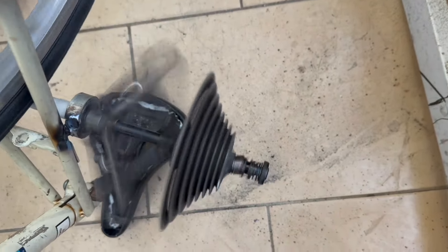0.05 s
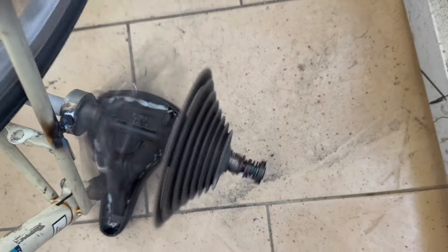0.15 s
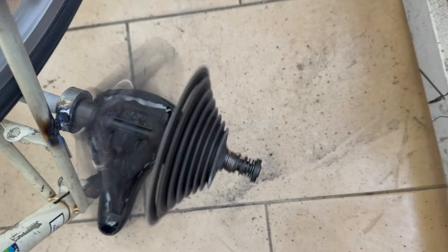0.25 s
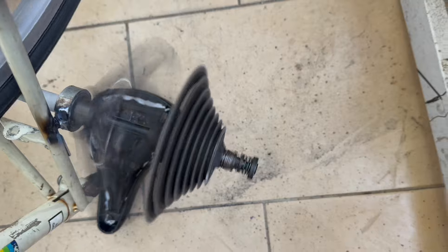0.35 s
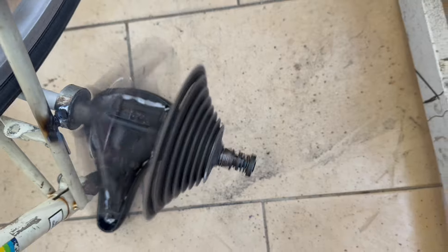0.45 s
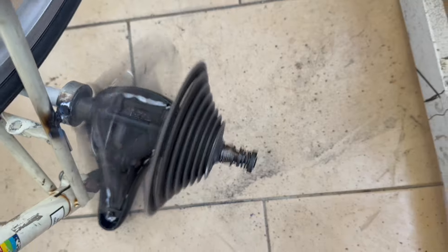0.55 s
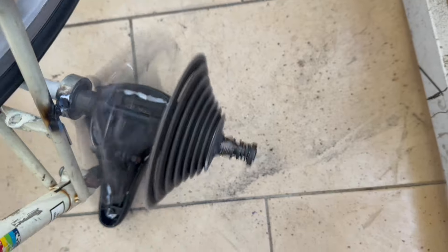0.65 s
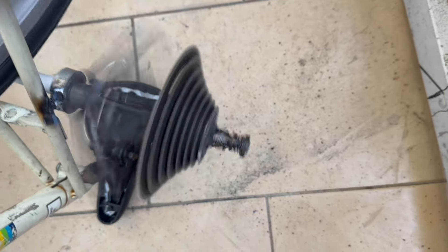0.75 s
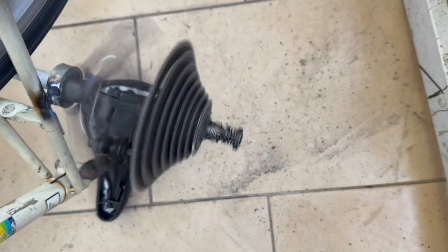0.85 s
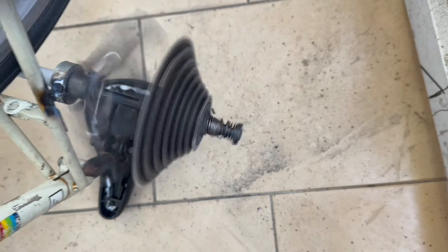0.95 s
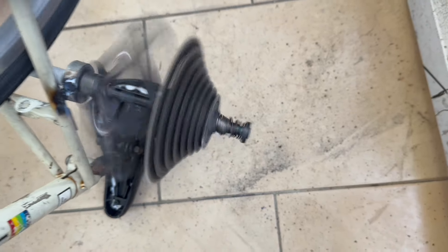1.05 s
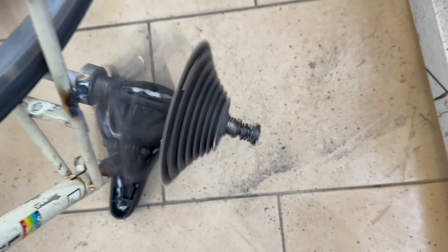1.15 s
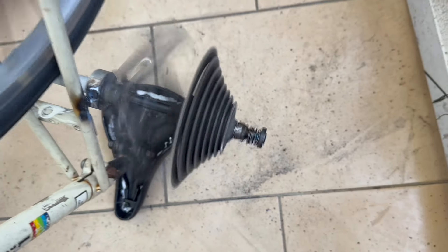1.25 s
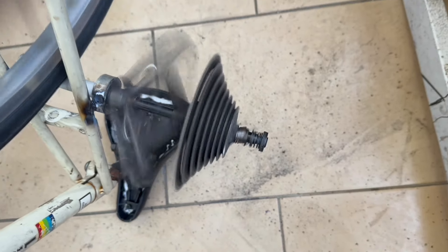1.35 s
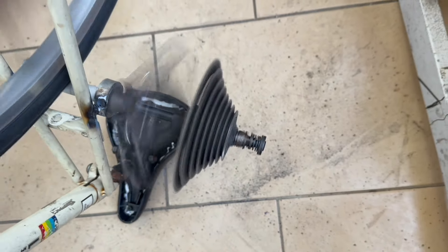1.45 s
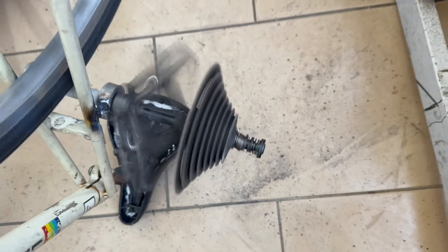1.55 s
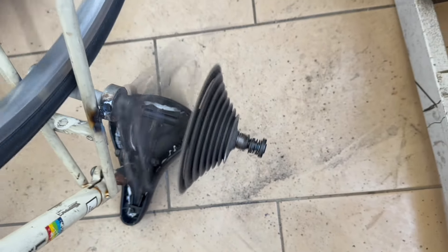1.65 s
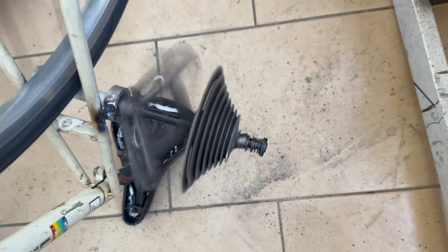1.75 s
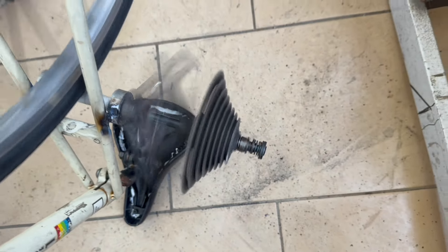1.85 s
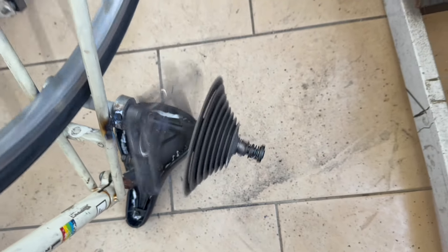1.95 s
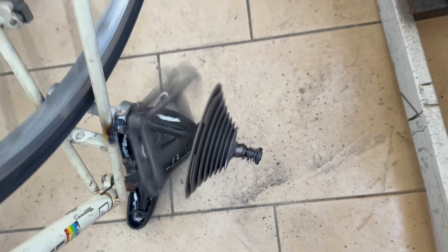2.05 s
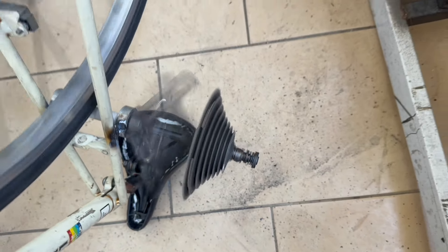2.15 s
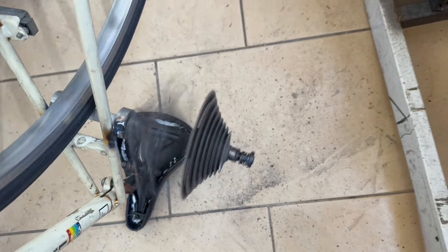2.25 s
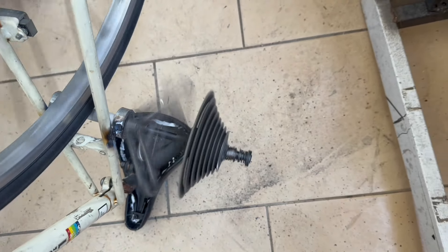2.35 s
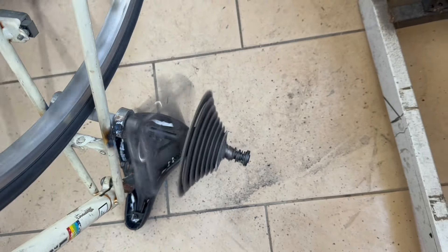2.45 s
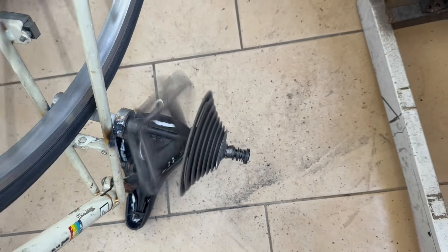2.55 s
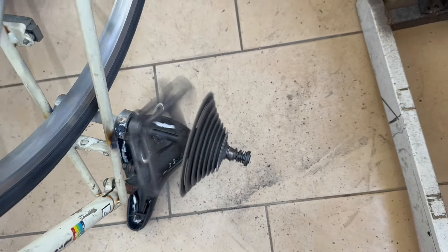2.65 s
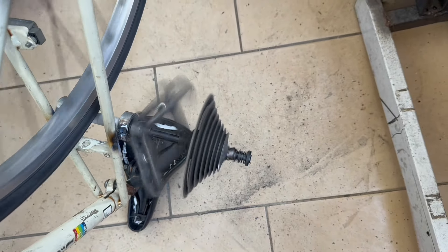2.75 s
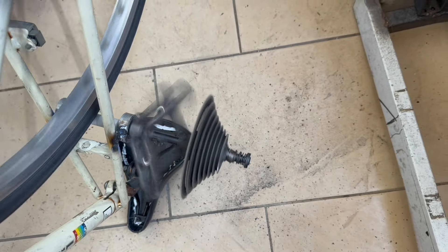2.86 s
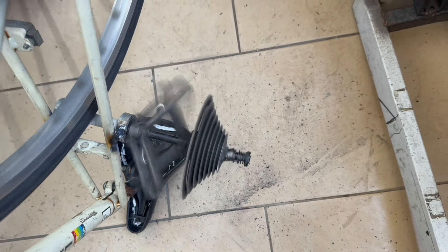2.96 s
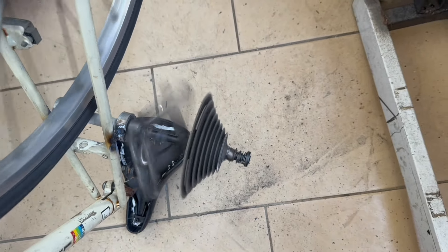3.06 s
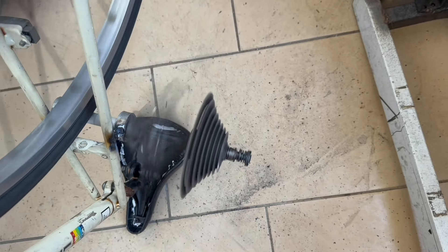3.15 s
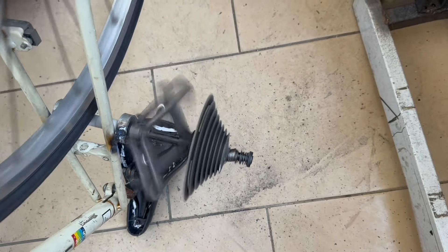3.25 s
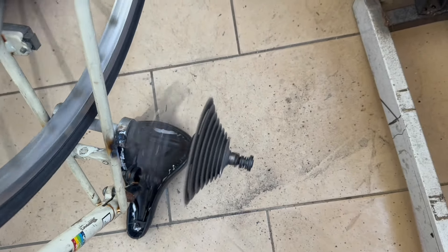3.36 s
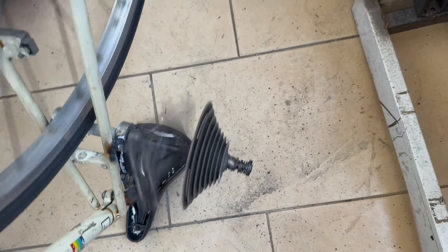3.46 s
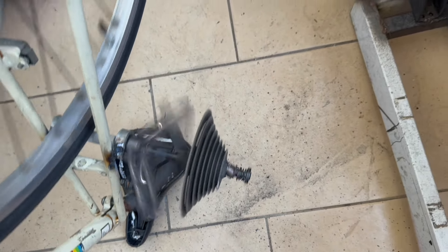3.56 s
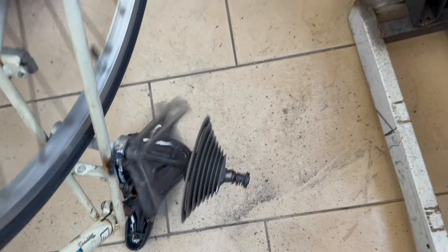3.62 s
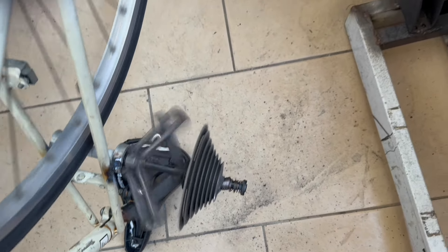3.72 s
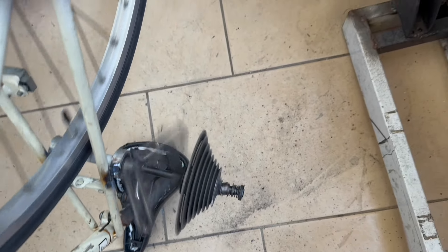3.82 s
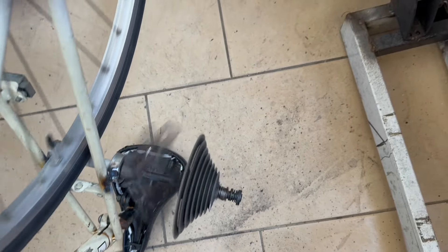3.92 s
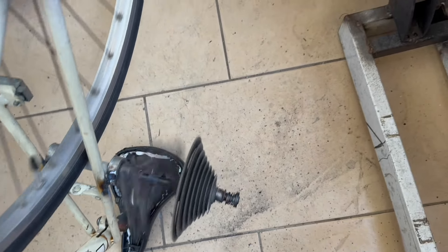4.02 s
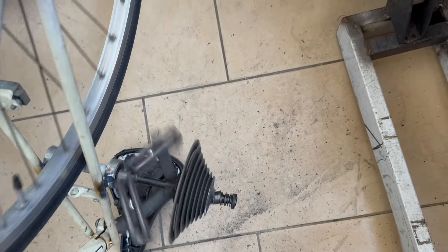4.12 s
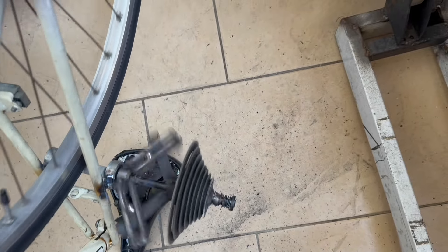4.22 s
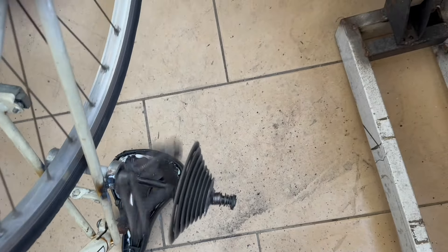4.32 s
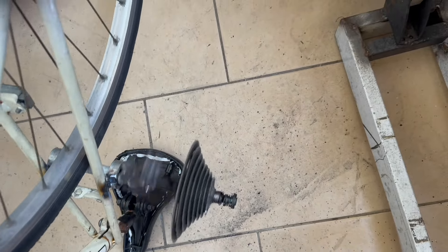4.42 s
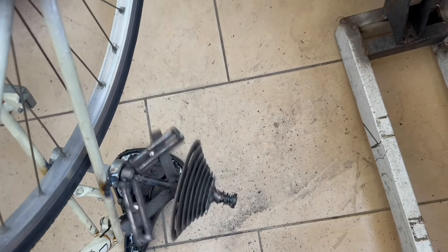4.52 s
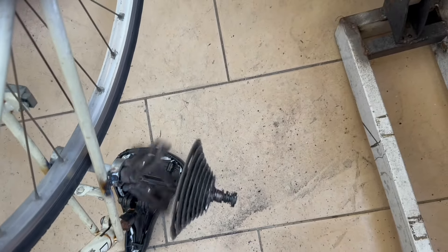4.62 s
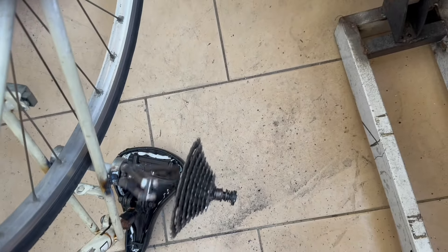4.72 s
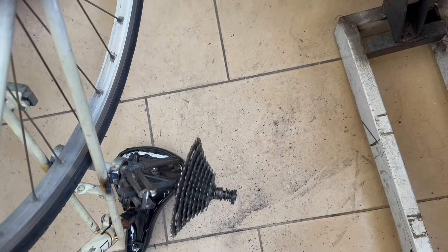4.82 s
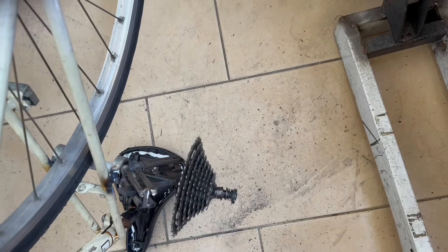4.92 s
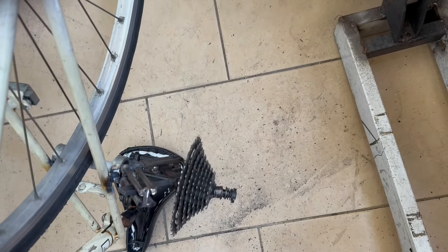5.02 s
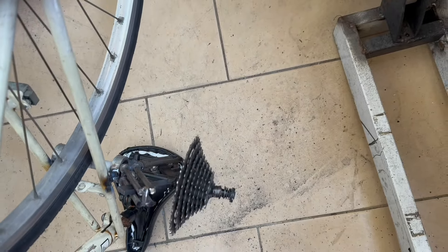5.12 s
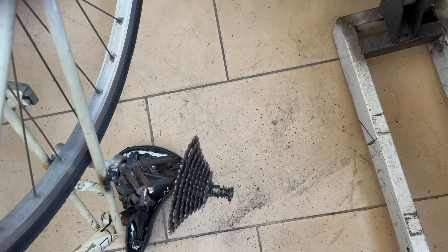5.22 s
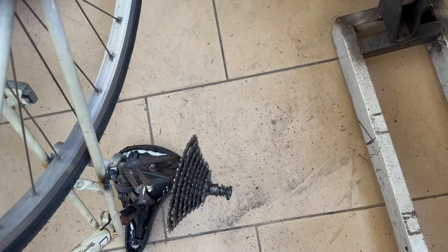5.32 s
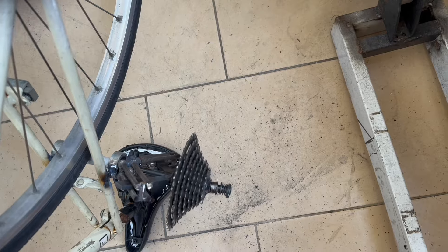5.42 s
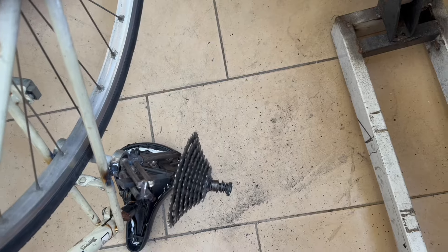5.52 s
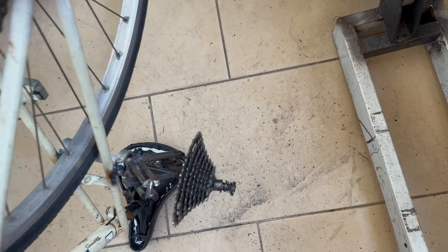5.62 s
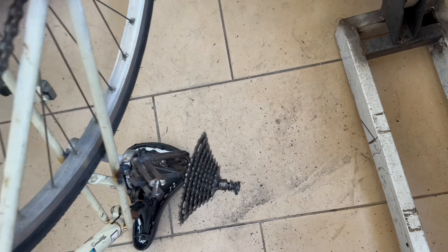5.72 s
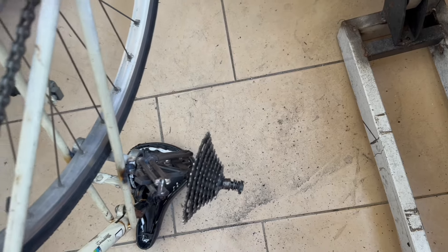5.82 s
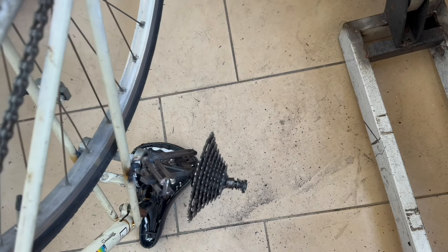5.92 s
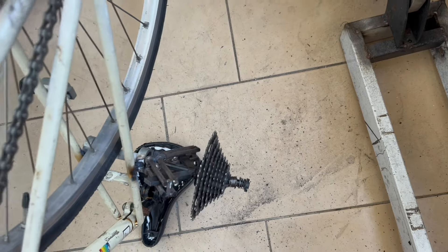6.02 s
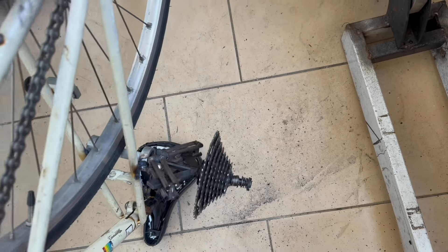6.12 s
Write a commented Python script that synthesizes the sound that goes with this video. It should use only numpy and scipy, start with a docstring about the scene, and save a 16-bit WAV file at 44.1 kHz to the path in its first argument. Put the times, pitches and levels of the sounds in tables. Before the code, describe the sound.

Close up in a small tiled room, a bicycle freewheel ticks very fast over a gritty bearing whir. The clicks are uneven in strength and gradually slow to separate ticks as the whir sinks away. Loose metal rattles faintly, then the drive catches with one hard, bright clack. Low room rumble remains, with faint brushing and a light frame knock near the end.

```python
"""A rapid ticking is heard first: a bicycle freewheel coasts down in a small tiled room.
One speed curve times the pawl's drops, strong and weak in a repeating round, and sinks the bearing whir.
Each blow on metal is a crack, a noise-like crowd of weak modes and a few clear decaying sines.
Loose metal ticks, the drive catches with one hard clack and chatters, and a last knock follows.
Filtered noise gives the low room rumble, a faint rub, and soft bumps and brushes of the hand."""
import sys
import numpy as np
from scipy import signal
from scipy.fft import rfft, irfft, next_fast_len
from scipy.io import wavfile
from scipy.ndimage import uniform_filter1d, minimum_filter1d

SR = 44100
rng = np.random.default_rng(int(sys.argv[2]) if len(sys.argv) > 2 else 0)


def dump(signal):
    """Clip the signal to [-1, 1] and save it as 16-bit WAV at the path in sys.argv[1]."""
    limited = np.clip(np.atleast_2d(signal).T, -1, 1)
    pcm = np.round(limited * 32767).astype(np.int16)
    wavfile.write(sys.argv[1], SR, pcm)


N = 272538

# Hub speed as it coasts, then drags to a stop: (time [s], tooth rate [teeth/s])
HUB_SPEED = [(0, 23.34), (.58, 20.129), (.98, 18.76), (2.31, 15.847), (2.73, 15.273), (3.12, 13.403),
             (3.62, 9.844), (4.4, 3.284), (4.72, 0)]
# How hard the pawl drops: (time [s], relative level [dB])
PAWL_FORCE = [(0, -5), (.33, -11), (.55, -7.5), (1.2, -4), (1.9, -8), (2.4, -6.5), (3.15, -10.5),
              (3.55, -8.5), (4.15, -10), (4.37, -13)]
# Uneven teeth, repeated round after round: (level offset of each tooth [dB])
TOOTH_OFFSETS = [1.8, -3, 1.1, 0.8, -1.5, 2, -4.5, -3.5, 3, -3, 1.8, -2.6, -2.5]
# Clear modes of hub and sprockets: (frequency [Hz], relative level [dB], T60 [s])
HUB_MODES = [(1346, -13, 0.24), (1940, -22, .1), (2085, -14.5, 0.11), (2376, -14, 0.1), (2756, -25, 0.11),
             (2860, -14.5, 0.091), (3580, -18.5, 0.16), (3867, -13.5, 0.12), (4120, -14.5, 0.12),
             (4630, -10, 0.1), (4650, -12.5, 0.11), (5810, -6.5, 0.062), (6300, -24, 0.068),
             (6500, -12, 0.093), (6850, -18, 0.11), (8110, -2, 0.072), (8290, -1, 0.027), (9600, 3, 0.04),
             (10450, -30, 0.051), (13200, -19, 0.055)]
# The crowd of weaker hub modes: (frequency [Hz], relative level per Hz [dB])
HUB_CROWD = [(300, -16.5), (1000, -9.5), (2200, -9), (2800, -13), (3800, -3), (4700, 1), (5400, -4),
             (6300, 6.5), (7300, -3.5), (9300, 4.5), (11500, -2.5), (13700, -1), (14200, -13),
             (15700, -20.5)]

# Loose metal ticks, then the catch and its chatter:
# (time [s], relative level [dB], brightness [dB/octave])
CLACKS = [(4.3217, -30, -14.5), (4.505, -22.5, -8.5), (4.511, -28, -12), (4.585, -28, -12.5),
          (4.593, -29.5, -14), (4.645, -36, -11.5), (4.688, -19.5, -3), (4.700, -22, -8), (4.71, -21.5, -6),
          (4.7172, -0.5, 3), (4.7222, -7, 0.5), (4.724, -12.5, -10), (4.727, -14.5, -7)]
# Clear modes of the drive: (frequency [Hz], relative level [dB], T60 [s])
CLACK_MODES = [(1373, -18.5, 0.14), (2520, -16.5, 0.11), (3200, -9, 0.066), (4300, -11, 0.07),
               (5000, -23, .1), (6600, -8, 0.072), (7060, -21, 0.12), (8800, -1, 0.0408), (9300, -6, 0.086),
               (10340, -5, 0.066), (13380, -4.5, 0.058)]
# The crowd of weaker drive modes: (frequency [Hz], relative level per Hz [dB])
CLACK_CROWD = [(100, -48), (400, -14), (1100, -17), (1900, -14), (2500, -9), (2900, -6), (3300, -4.5),
               (3750, -6), (4300, -1.5), (5800, -7.5), (7600, -4.5), (9200, 4.5), (12000, -1),
               (15000, -6.5), (16000, -26)]

# Knocks on the frame as the bicycle is moved: (time [s], relative level [dB], brightness [dB/octave])
KNOCKS = [(5.415, -40, -23), (5.471, -35.5, -15), (5.483, -43, -12), (5.7228, -28, -2), (5.726, -18.5, -2),
          (5.7296, -22.5, 1.5), (5.7315, -27, 6)]
# Clear modes of the frame: (frequency [Hz], relative level [dB], T60 [s])
KNOCK_MODES = [(1650, 2.5, 0.049), (1810, -2, 0.076), (2120, -9, 0.061), (4440, 0, .04), (4540, 0, 0.043),
               (5030, -11, .11), (8700, -7, .04)]
# The crowd of weaker frame modes: (frequency [Hz], relative level per Hz [dB])
KNOCK_CROWD = [(300, -26), (1100, -3), (1800, 8.5), (3000, -6.5), (4500, 4), (6500, -4), (8600, 0.5),
               (11500, -5), (15700, -7)]

# Colour of the rolling bearings: (frequency [Hz], relative level per Hz [dB])
WHIR_COLOUR = [(60, 5), (130, -7.5), (200, -6), (340, -1.5), (560, -6.5), (820, -0.5), (1050, -6),
               (1350, 6), (1750, -1.5), (2200, 4.5), (3100, -4.5), (6000, -13), (11000, -8), (15000, -21)]
# Resonances the bearings keep ringing: (frequency [Hz], width [Hz], relative level [dB])
WHIR_RINGS = [(720, 80, -6), (926, 35, -3), (1340, 80, -3), (1464, 41, -1), (1795, 49, -4),
              (1970, 48, -4.5), (2550, 180, -9), (4780, 85, -3.5)]

# Rub as the drive creeps to rest and as the bicycle shifts: (time [s], length [s], level [dB])
RUBS = [(4.052, .5, -51), (5.523, 0.35, -50)]
# Colour of the rub: (frequency [Hz], relative level per Hz [dB])
RUB_COLOUR = [(1500, 0.5), (4300, -8), (5050, 1), (5800, -6.5), (9000, -7), (15000, -11.5)]
# Soft bumps of the hand: (time [s], level [dB], centre frequency [Hz])
BUMPS = [(.66, -31, 161), (2.064, -26, 142), (2.808, -33, 135), (5.70, -31.5, 152)]
# Faint brushing in the lull: (time [s], level [dB], centre frequency [Hz])
BRUSHES = [(4.905, -60, 7150), (5.075, -57, 6930), (5.235, -55.5, 7300)]

# Colour of the room rumble: (frequency [Hz], relative level per Hz [dB])
RUMBLE_COLOUR = [(40, -17.5), (100, -5.5), (140, -1), (200, -1.5), (330, -4.5), (520, -8), (840, -11),
                 (1250, -16), (1850, -19.5), (3600, -36.5), (8000, -42), (16000, -55)]
# Low room resonances that drone: (frequency [Hz], width [Hz], relative level [dB])
DRONE_RESONANCES = [(140, 14, -1.5), (197.5, 8, -12), (260, 9.9, -5.5), (342.3, 3.3, -7),
                    (417.7, 9.7, -3.5), (507, 14, -8), (829, 16, -6)]
# Colour of the deep boom: (frequency [Hz], relative level per Hz [dB])
BOOM_COLOUR = [(25, -13.5), (42, -5), (64, -1.5), (85, -9), (115, -20.5), (400, -65)]
# Decay of the room: (frequency [Hz], T60 [s])
ROOM_T60 = [(500, 0.29), (2000, 0.19), (6000, .19), (10000, 0.12), (15000, 0.12)]

# Likeness of the two noise channels: (frequency [Hz], correlation [0 to 1])
LIKENESS = [(60, 1), (120, 0.86), (350, 0.76), (700, 0.34), (2000, 0.22), (7000, 0.35)]
# Stereo balance: (frequency [Hz], left minus right level [dB])
BALANCE = [(60, 0), (170, -2.5), (350, 1), (700, 3), (3000, 3), (5500, 3.5), (6500, 6.5), (7400, 2),
           (8000, 0)]
# Treble phase lag of the right channel: (frequency [Hz], phase [rad])
PHASE_LAG = [(8100, 0), (8600, -.7), (9100, -2.2), (9600, -3.14), (10000, -3.8), (10800, -6.1),
             (11400, -6.5), (12100, -8.6), (13000, -9.9), (13700, -12.4), (14700, -12.9), (16000, -14.2)]

FIRST_TOOTH_S = 0.0149
GRAZE_S, GRAZE_DB = 3.18, -11  # the pawl only grazes the tooth nearest this time
BRIGHTENING, USUAL_DB = 0.37, -7  # dB/octave gained per dB above the usual strength
CONTACT_S, CRACK_S = 0.0002, 0.0008  # time constants of a blow's onset and of its crack
MODE_WANDER_HZ, MODE_WANDER_SHARE = 18, 0.0059  # chance shift: fixed part, share of mode frequency
RUB_SWELL_DB_PER_S, RUB_FADE_DB_PER_S = 43, 62
BOOM_DB, BOOM_EXTRA_DB, BOOM_SETTLE_S = -35.5, 7, 0.81  # settled level, initial excess, time constant
EDGE_HZ = 15850  # upper band limit


def ratchet(level_db=-4, slip_db=-17):
    """Impulsive excitation: the pawl slips off each tooth tip, then drops and rings the hub."""
    out = np.zeros((2, N))
    slip_s, drop_s = -0.0007, 0.0005  # relative to the passing of the tooth
    times = tooth_times()
    strengths = follow(PAWL_FORCE, times) + np.resize(TOOTH_OFFSETS, len(times))
    strengths[np.argmin(abs(times - GRAZE_S))] += GRAZE_DB
    for time, db in zip(times, strengths):
        # a harder drop is brighter
        tilt_db = BRIGHTENING * (db - USUAL_DB)
        for offset, part_db in ((slip_s, slip_db), (drop_s, 0)):
            click = strike(HUB_MODES, HUB_CROWD, tilt_db, t60=0.067, ring_db=-9, crack_db=-10)
            add(out, time + offset, gain_of(db + part_db + level_db) * click)
    return out


def tooth_times():
    """Integration of angular speed: a tooth passes whenever the running count reaches a whole number."""
    t = np.arange(round(FIRST_TOOTH_S * SR), N) / SR
    passed = np.cumsum(follow(HUB_SPEED, t)) / SR
    teeth = np.arange(int(passed[-1]) + 1)
    return np.interp(teeth, passed, t)


def clacks(level_db=-4, ring_growth=0.16):
    """Impact across play: small dead ticks, then a hard chattering stop whose metal rings more."""
    out = np.zeros((2, N))
    for time, db, tilt_db in CLACKS:
        ring_db = ring_growth * db - 4.0
        blow = strike(CLACK_MODES, CLACK_CROWD, tilt_db, t60=0.076, ring_db=ring_db, crack_db=-5.5)
        add(out, time, gain_of(db + level_db) * blow)
    return out


def knocks(level_db=-5, ring_growth=0.69):
    """Modal response of the frame: the lighter the blow, the less it rings."""
    out = np.zeros((2, N))
    for time, db, tilt_db in KNOCKS:
        ring_db = ring_growth * db + 5.0
        blow = strike(KNOCK_MODES, KNOCK_CROWD, tilt_db, t60=0.1, ring_db=ring_db, crack_db=-9)
        add(out, time, gain_of(db + level_db) * blow)
    return out


def strike(modes, body, tilt_db, t60, ring_db, crack_db, size=16384):
    """Modal superposition: a short crack, a dense crowd of modes and a few clear decaying sines."""
    t = np.arange(size) / SR
    hz, db, ring_t60 = np.transpose(modes)[:, :, None]

    def tilt(f):
        """Contact stiffness: a spectral slope above 3 kHz, zero at 6 kHz and level below 3 kHz."""
        return tilt_db * np.log2(np.maximum(f, 3000) / 6000)

    crowd = noise([(f, level + tilt(f)) for f, level in body], size)
    crack_envelope = gain_of(crack_db) * np.exp(-t / CRACK_S)
    crowd *= gain_of(-60 * t / t60) + crack_envelope
    # every blow lands at another spot, so the modes take uneven shares and shift a little
    share, shift = rng.standard_normal((2, len(hz), 1))
    db = db + tilt(hz) + 2.5 * share
    hz = hz + (MODE_WANDER_HZ + MODE_WANDER_SHARE * hz) * shift
    # a common random phase, with a small difference between the channels
    phase = 2 * np.pi * rng.random(hz.shape) + 0.4 * rng.standard_normal((2, len(hz), 1))
    sines = np.sin(2 * np.pi * hz * t + phase)
    clear = (gain_of(db - 60 * t / ring_t60) * sines).sum(1)
    onset = 1 - np.exp(-t / CONTACT_S)
    return (crowd + gain_of(ring_db) * clear) * onset


def whir(low_db=-30, high_db=-27, rings_db=-32, low_power=1.52, high_power=2.64, ring_power=1.76,
         grit_db=1.5, wobble_db=2.0, split_hz=1000):
    """Rolling noise: power laws in speed make the bearings' treble fade faster than their bass."""
    speed = follow(HUB_SPEED, np.arange(N) / SR) / follow(HUB_SPEED, 0)
    roll = noise(WHIR_COLOUR, N)
    lowpass = signal.butter(2, split_hz, fs=SR, output="sos")
    low = signal.sosfiltfilt(lowpass, roll)
    # balls run over specks in the races, under a load that wobbles: the hiss is gritty
    specks = evened(uniform_filter1d(rng.standard_normal(N), size=130))
    load = evened(uniform_filter1d(rng.standard_normal(N), size=3000))
    grit = evened(gain_of(grit_db * specks + wobble_db * load))
    body = gain_of(low_db) * evened(low) * speed ** low_power
    hiss = gain_of(high_db) * grit * evened(roll - low) * speed ** high_power
    # the same grit keeps the hub ringing
    ringing = resonate(grit * noise(WHIR_COLOUR, N), WHIR_RINGS)
    rings = gain_of(rings_db) * ringing * speed ** ring_power
    return body + hiss + rings


def rubbing():
    """Friction noise: one coloured noise swells, holds and fades at constant dB rates."""
    t = np.arange(N) / SR
    out = np.zeros((2, N))
    rub = noise(RUB_COLOUR, N)
    for start, length, db in RUBS:
        swell_db = RUB_SWELL_DB_PER_S * np.maximum(start - t, 0)
        fade_db = RUB_FADE_DB_PER_S * np.maximum(t - start - length, 0)
        out += gain_of(db - swell_db - fade_db) * rub
    return out


def hand_touches():
    """Band-limited noise bursts: low, wide bands for bumps and high, narrow ones for brushes."""
    out = np.zeros((2, N))
    for time, db, hz in BUMPS:
        add(out, time, gain_of(db) * puff(hz, octaves=0.77, rise=0.0078))
    for time, db, hz in BRUSHES:
        add(out, time, gain_of(db) * puff(hz, octaves=0.18, rise=0.015))
    return out


def room_rumble(rumble_db=-39, drone_db=-44):
    """Resonant filtering of noise: a steady rumble and drone, and a boom that settles exponentially."""
    t = np.arange(N) / SR
    rumble = gain_of(rumble_db) * noise(RUMBLE_COLOUR, N)
    drone = gain_of(drone_db) * resonate(noise(RUMBLE_COLOUR, N), DRONE_RESONANCES)
    boom_db = BOOM_DB + BOOM_EXTRA_DB * np.exp(-t / BOOM_SETTLE_S)
    return rumble + drone + gain_of(boom_db) * noise(BOOM_COLOUR, N)


def room(x, delay=0.0028):
    """Reverberation by convolution: tiles give dense reflections whose treble dies first."""
    hz, t, z = signal.stft(rng.standard_normal((2, SR // 2)), SR, nperseg=256)
    decay = gain_of(-60 * t / read(ROOM_T60, hz)[:, None])
    tail = signal.istft(z * decay, SR, nperseg=256)[1]
    # silent up to the delay [s], then rising to full over an equal time
    tail *= np.clip(np.arange(tail.shape[1]) / SR / delay - 1, 0, 1)
    return signal.fftconvolve(x, tail / np.linalg.norm(tail[0]), axes=1)[:, :N]


def noise(spectrum, size):
    """Partial coherence: stereo noise of a given colour and rms 1, most alike in the bass."""
    hz = np.fft.rfftfreq(size, 1 / SR)
    a, b = rfft(rng.standard_normal((2, size)))
    same = np.clip(read(LIKENESS, hz), 0, 1)
    pair = np.array([a, same * a + np.sqrt(1 - same ** 2) * b])
    highpass = hz / np.hypot(hz, 20)
    return evened(irfft(pair * gain_of(read(spectrum, hz)) * highpass, size))


def resonate(x, peaks):
    """Parallel resonance: x through a bank of peak filters of given bandwidth, at rms 1."""
    total = 0
    for hz, width, db in peaks:
        b, a = signal.iirpeak(hz, hz / width, SR)
        total = total + gain_of(db) * evened(signal.lfilter(b, a, x))
    return evened(total)


def puff(hz, octaves, rise):
    """Amplitude modulation: a soft swell of noise around one frequency, peaking after the rise [s]."""
    u = np.arange(SR // 5) / SR / rise
    band = [(hz / 8 ** octaves, -40), (hz / 2 ** octaves, -10), (hz, 0),
            (hz * 2 ** octaves, -14), (hz * 8 ** octaves, -60)]
    return u * np.exp(1 - u) * noise(band, len(u))


def gain_of(db):
    """Logarithmic level: decibels to amplitude."""
    return 10 ** (np.asarray(db) / 20)


def evened(x):
    """Normalisation of mean power: scales to rms 1."""
    return x / np.sqrt(np.mean(x ** 2) + 1e-20)


def read(points, hz):
    """Logarithmic pitch: interpolates a spectrum table on a log-frequency axis."""
    f, value = np.transpose(points)
    return np.interp(np.log(hz + 1), np.log(f + 1), value)


def follow(curve, s):
    """Linear interpolation: reads a control curve at times s."""
    return np.interp(s, *np.transpose(curve))


def add(mix, s, sound):
    """Superposition: mixes a stereo sound in at time s."""
    part = mix[:, max(round(s * SR), 0):][:, :sound.shape[1]]
    part += sound[:, :part.shape[1]]


def scene(room_db=-8):
    """Superposition of sources: metal blows with their reverberation, the whir and the background."""
    metal = ratchet() + clacks() + knocks()
    background = rubbing() + hand_touches() + room_rumble()
    return metal + gain_of(room_db) * room(metal) + whir() + background


def record(dry, ceiling=0.89):
    """Interchannel level and phase: a mostly shared, phase-shifted treble; then limiter and band limit."""
    size = next_fast_len(N + SR // 10)
    hz = np.fft.rfftfreq(size, 1 / SR)
    left, right = rfft(dry, size)
    shared = np.clip(read([(7000, 0), (8200, 0.85)], hz), 0, 1)
    right = (shared * left + (1 - shared) * right) / np.sqrt(1 - shared * (1 - shared))
    # half of the level difference goes to each side
    lean = gain_of(read(BALANCE, hz) / 2)
    twist = np.exp(-1j * np.interp(hz, *np.transpose(PHASE_LAG)))
    pair = irfft(np.array([left * lean, right / lean * twist]), size)[:, :N]
    # the limiter dips for about a millisecond either side of each overshoot
    headroom = np.minimum(1, ceiling / (abs(pair).max(0) + 1e-9))
    limited = pair * uniform_filter1d(minimum_filter1d(headroom, size=45), size=45)
    lowpass = signal.firwin(301, EDGE_HZ, window=("kaiser", 8), fs=SR)
    return signal.oaconvolve(limited, lowpass[None], "same")


dry = scene()
out = record(dry)
dump(out)
```